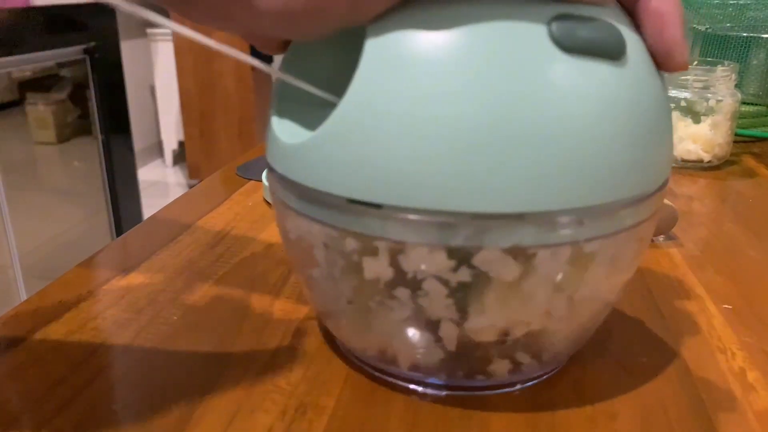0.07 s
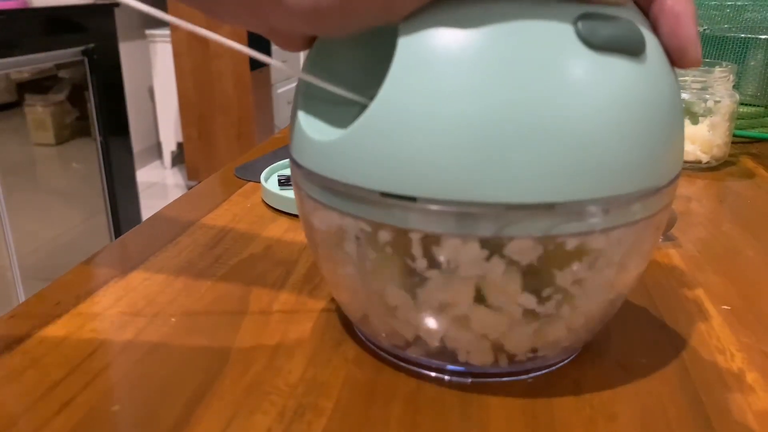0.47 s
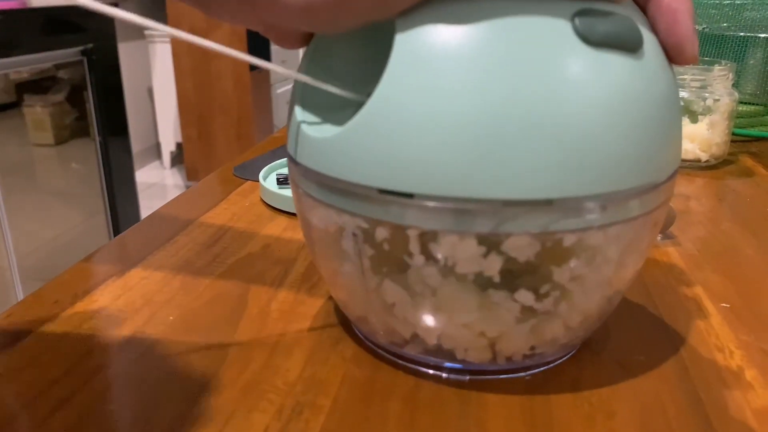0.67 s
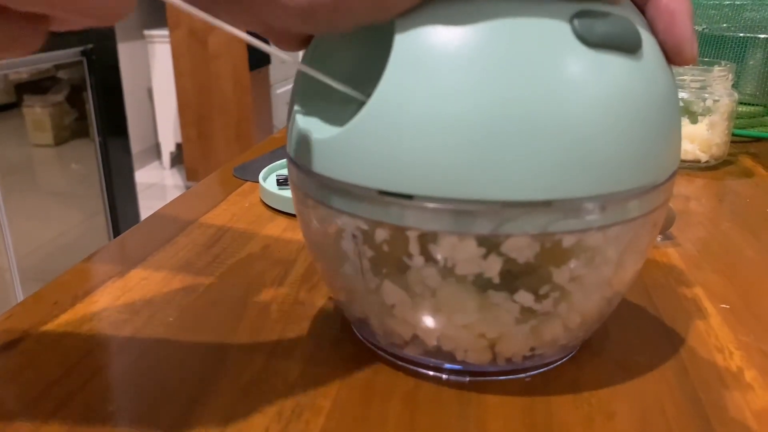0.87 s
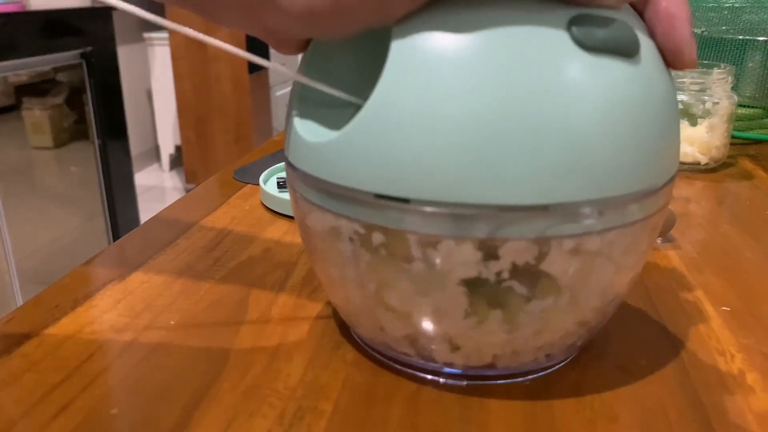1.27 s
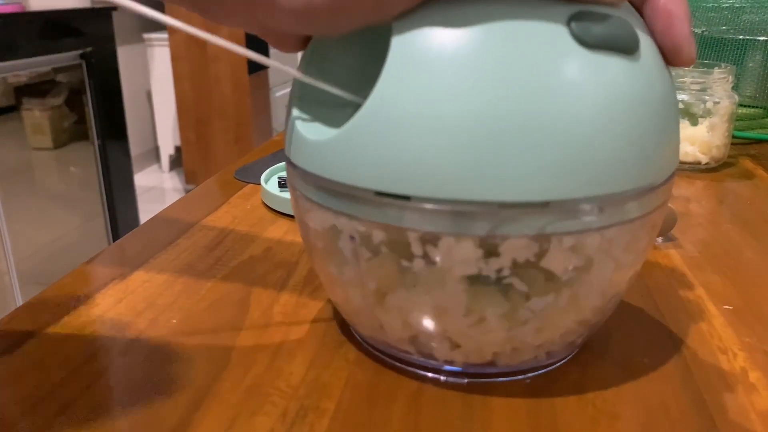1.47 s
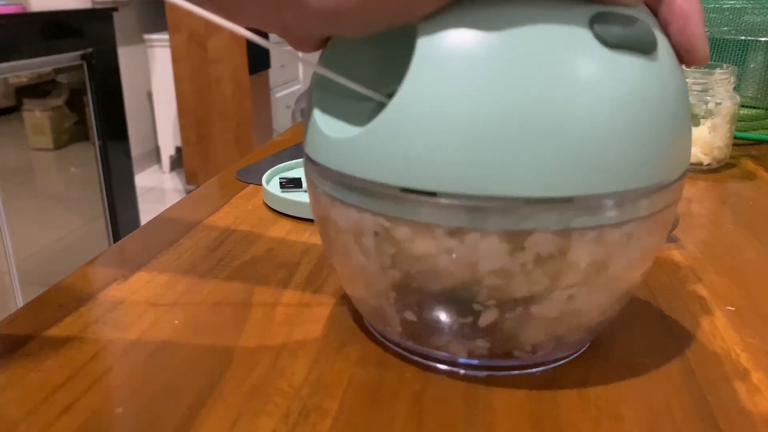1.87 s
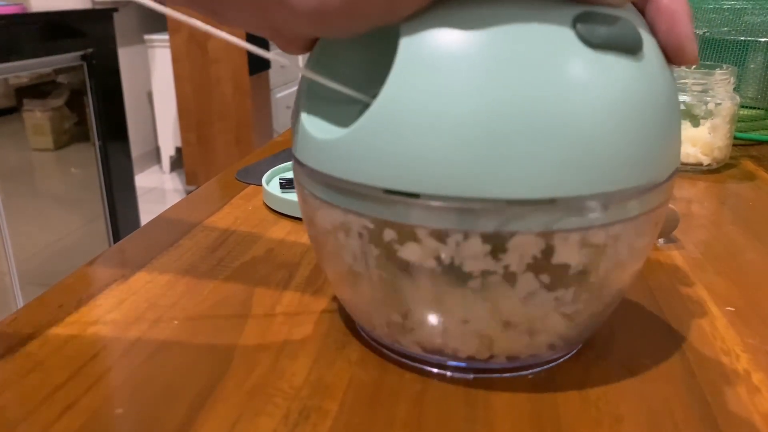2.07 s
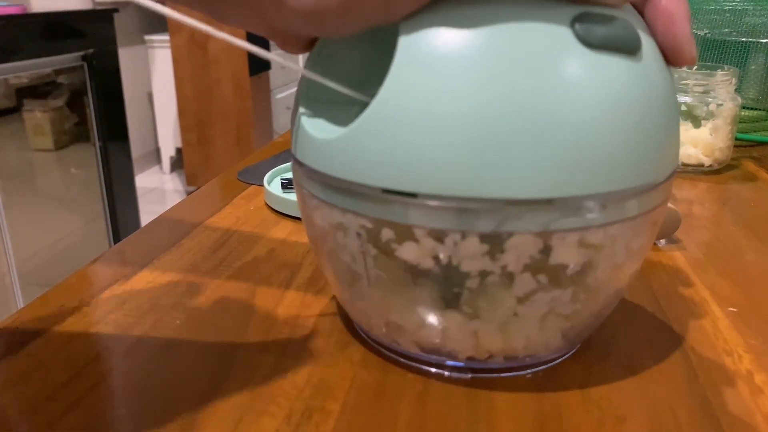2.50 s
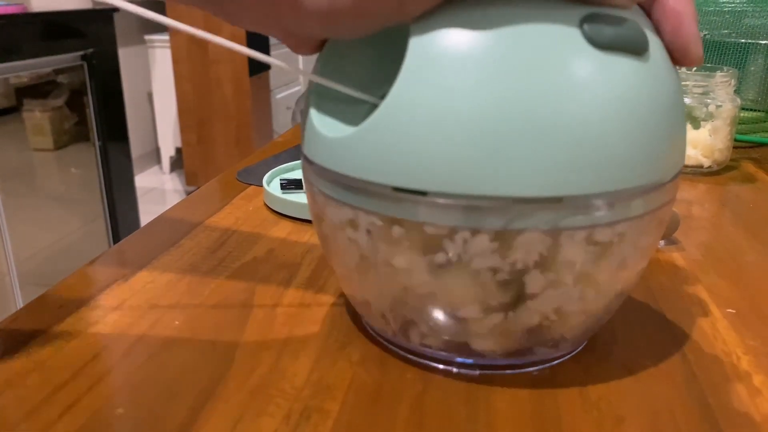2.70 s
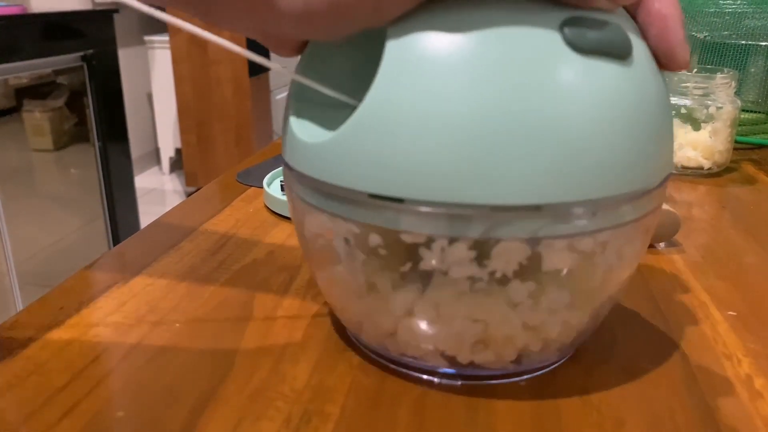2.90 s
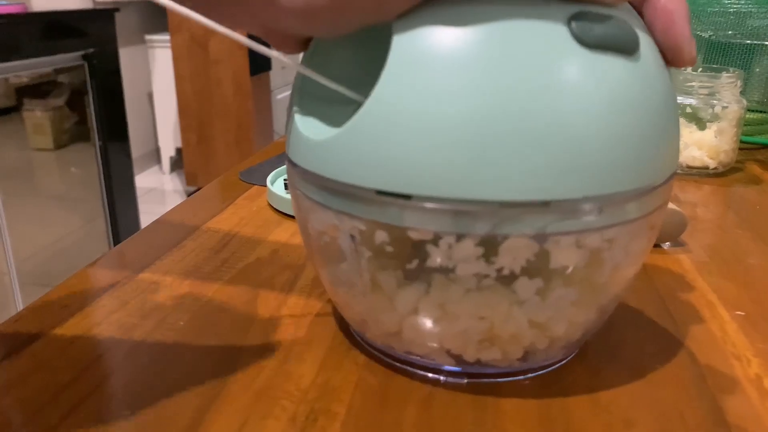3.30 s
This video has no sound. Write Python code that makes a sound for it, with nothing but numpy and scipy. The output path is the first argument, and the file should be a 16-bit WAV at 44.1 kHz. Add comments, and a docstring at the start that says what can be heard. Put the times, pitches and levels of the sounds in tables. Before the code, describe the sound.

A pull-cord food chopper is pulled four times, close by in a quiet kitchen. With each pull the cord rasps and pieces knock around the plastic bowl, then the reel rattles back and ends with a clack.

```python
"""Hand chopper on a kitchen table

A pull-cord chopper on a wooden table, close to a stereo pair and a little left, in a quiet kitchen.
Four pulls, then a faint tug: the cord rasps, the blades churn and food knocks on the plastic bowl.
After each of the four the spring reel rattles back over its ratchet and the slack goes with a clack."""
import sys
import numpy as np
from scipy import signal
from scipy.fft import rfft, irfft, next_fast_len
from scipy.io import wavfile
from scipy.ndimage import map_coordinates

SR = 44100
rng = np.random.default_rng(int(sys.argv[2]) if len(sys.argv) > 2 else 0)


def master_out(mix):
    """Clip the mix to full scale and print it as 16-bit PCM to the path in sys.argv[1]."""
    frames = np.transpose(np.atleast_2d(mix))
    ceiling = np.clip(frames, -1, 1)
    pcm = np.round(ceiling * 32767).astype(np.int16)
    wavfile.write(sys.argv[1], SR, pcm)


N = 152145

# Spectrum of the reel's spring and pawl. Each row: frequency in Hz, relative level in dB.
REEL = [(600, -13), (2300, -31), (2900, -11.5), (3400, -6.5), (4800, -2), (6000, -2), (7500, 0.5),
        (8900, 8), (11000, 0), (12400, 6), (14200, 6), (15300, -22), (16000, -14)]


def pulls():
    """The blades churn fine food round the bowl while the cord rasps through its eye."""
    # Spectra of the food and the cord. Each row: frequency in Hz, relative level in dB.
    churn = [(30, -48), (90, -23), (170, -1.5), (380, 6.5), (560, -3), (800, 3), (1050, -6.5), (1900, -6),
             (3000, -11.5), (4200, -9), (8000, -60)]
    rasp = [(800, -71), (3000, -3.5), (4800, 7.5), (6200, 9.5), (8000, 8.5), (9500, 16), (11500, 0),
            (13300, 14.5), (14800, -7), (16000, -26)]
    blade_gain = effort(start_db=-9.5, end_db=-10.5, coast_db=-12.5)
    cord_gain = effort(start_db=-9.5, end_db=-13, coast_db=-22)
    food = grains(blade_gain, churn, per_s=540, spread_db=1.0, life=0.51, spots=12)
    cord = grains(cord_gain, rasp, per_s=4500, spread_db=6.5, life=1.0, spots=14)
    return amp(1) * food + amp(-1.5) * cord


def effort(start_db, end_db, coast_db):
    """Gain over the pulls: build-up, full force, easing off, coasting; dB against full force."""
    # Pulls of the cord. Each row: start, full force, easing and end in seconds, relative level in dB.
    strokes = [(0.048, 0.112, 0.17, 0.35, -30), (0.936, 1.032, 1.117, 1.236, -30),
               (1.754, 1.785, 1.895, 2.01, -30), (2.549, 2.585, 2.65, 2.804, -33.5),
               (3.372, 3.405, 3.67, 3.44, -45)]
    release_s, rise_db_per_s, coast_db_per_s = 0.0046, 1000, 61
    t, gain = np.arange(N) / SR, np.zeros(N)
    for start, full, ease, end, db in strokes:
        force_db = np.interp(t, [start, full, ease, end, end + release_s],
                             [start_db, 0, 0, end_db, coast_db])
        gain += amp(force_db) * spin([(start, end, db)], rise_db_per_s, coast_db_per_s)
    return gain


def chunks():
    """Larger pieces thud against the bowl and crunch under a blade in five steps, the middle hardest."""
    # Pieces the blades strike. Each row: time in seconds, relative thud and crack levels in dB.
    strikes = [(.128, -13.5, -17.5), (0.149, -25, -20.5), (.165, -18, -17), (.197, -25, -23),
               (.215, -19.5, -24), (.233, -29, -33), (0.290, -27, -25), (0.347, -25, -32),
               (.396, -33.5, -60), (0.548, -19.5, -25), (0.987, -33, -19.5), (1.015, -16, -18.5),
               (1.036, -21.5, -42), (1.063, -19.5, -16.5), (1.086, -18.5, -17), (1.107, -16.5, -20.5),
               (1.142, -29, -25), (1.168, -56, -24.5), (1.205, -28, -39), (1.398, -33, -21),
               (1.798, -13.5, -20), (1.838, -39, -23), (1.860, -18.5, -14.5), (1.868, -22.5, -26),
               (1.882, -23, -47), (1.917, -30, -19), (1.994, -30, -28), (2.029, -28.5, -30),
               (2.204, -27.5, -31), (2.219, -21.5, -40), (2.411, -47, -39), (2.594, -25.5, -25.5),
               (2.624, -31, -50), (2.666, -22, -19.5), (2.691, -26, -27), (2.71, -23.5, -25),
               (2.721, -20.5, -25), (2.922, -38, -62), (3.021, -25, -34), (3.128, -25, -33)]
    # Spectra of thud and crack. Each row: frequency in Hz, relative level in dB.
    thud = [(40, -70), (120, -21), (230, 1.5), (370, 7.5), (560, 1), (850, 6), (1300, -17.5), (4000, -49)]
    crack = [(200, -11), (700, -7), (1200, -1.5), (1450, -0.5), (1850, 2), (2300, 0.5), (2900, -2.5),
             (3500, -4.5), (4400, -4.5), (6500, -6.5), (10000, -10.5)]
    step_s, step_loss_db = .002, 3.5
    out = np.zeros((2, N))
    for s, thud_db, crack_db in strikes:
        add(out, s, hit(thud_db, thud, life=0.53, attack_s=0.0011))
        for k in range(5):
            at = s + (k - 1 + rng.uniform(-.5, .5)) * step_s
            step_db = crack_db - 1.5 - abs(k - 2) * step_loss_db
            add(out, at, hit(step_db, crack, life=0.6, attack_s=0.0005))
    return out


def rewinds():
    """The reel spins back: the pawl ticks over its teeth, the spring scrapes, the housing rumbles."""
    # The reel winds the cord in, and races when the hand gives way.
    # Each row: start and end in seconds, relative level in dB.
    returns = [(.48, .785, -40), (1.33, 1.585, -41.5), (2.14, 2.43, -41), (2.96, 3.18, -45)]
    surges = [(.517, .588, -28.5), (.66, .70, -32.5), (1.362, 1.47, -30.5), (1.492, 1.528, -31),
              (2.188, 2.247, -25.5), (2.295, 2.345, -32.5), (2.983, 3.135, -32.5)]
    # Spectrum of the housing. Each row: frequency in Hz, relative level in dB.
    rumble = [(30, -66), (90, -29), (200, -3.5), (380, 0), (540, -3.5), (850, -2), (1050, -10), (1650, -10),
              (2300, -18), (3000, -17), (6000, -15)]
    run = spin(returns, rise_db_per_s=412, fall_db_per_s=220)
    race = spin(surges, rise_db_per_s=1300, fall_db_per_s=918)
    pawl = ratchet(run + amp(3.5) * race)
    spring = grains((run + race) * clumps(), REEL, per_s=510, spread_db=5, life=0.9, spots=6)
    housing = grains(run + amp(-1) * race, rumble, per_s=800, spread_db=9, life=0.63, spots=6)
    return amp(-10) * pawl + amp(-1.5) * spring + amp(-3) * housing


def ratchet(gain, teeth_per_s=54, scatter_teeth=.12, spread_db=0.83):
    """The pawl ticks once a tooth, slightly uneven in time and strength."""
    teeth = np.arange(1, int(N / SR * teeth_per_s) - 1)
    timing, strength = rng.standard_normal(size=(400, 2))[teeth].T
    at = (teeth + scatter_teeth * timing) / teeth_per_s * SR
    ticks = np.zeros(N)
    ticks[np.clip(at, 0, N - 1).astype(int)] = amp(spread_db * strength)
    tooth = ring(REEL, life=1.9, attack_s=0.0017)
    return signal.oaconvolve((unit(ticks) * gain)[None], tooth, axes=1)[:, :N]


def clumps(swing_db=0.5, changes_per_s=140):
    """The spring's coils slip in clumps: a fast, slightly uneven gain of rms 1."""
    at = np.arange(N) / SR * changes_per_s
    return unit(amp(swing_db * map_coordinates(rng.standard_normal(size=1024), [at], mode="mirror")))


def snaps():
    """Spring coils and pawl catch, then let go in three quick slips, each weaker than the last."""
    # Sharp snaps in the reel. Each row: time in seconds, relative level in dB.
    catches = [(0.108, -12.5), (0.127, -23), (0.183, -11.5), (.191, -22.5), (0.492, -30), (.512, -24.5),
               (0.523, -17.5), (0.546, -30.5), (.562, -11.5), (0.581, -15), (0.627, -22), (0.658, -19),
               (.684, -21.5), (0.691, -27), (0.734, -24), (0.995, -14.5), (1.0111, -15.5), (1.078, -12),
               (1.108, -25.5), (1.338, -29.5), (1.362, -22), (1.375, -19), (1.389, -21), (1.411, -14.5),
               (1.426, -20), (1.437, -18.5), (1.452, -17.5), (1.491, -16.5), (1.513, -18), (1.520, -18.5),
               (1.776, -18), (1.792, -17.5), (1.85, -15), (1.858, -20), (2.157, -25), (2.17, -21),
               (2.192, -18), (2.215, -15), (2.235, -12.5), (2.269, -21.5), (2.306, -21.5), (2.332, -18),
               (2.579, -20), (2.677, -15), (2.982, -21), (3.018, -14.5), (3.042, -25), (3.059, -27),
               (3.071, -21), (3.089, -26), (3.111, -36), (3.127, -20.5), (3.147, -41), (3.163, -24),
               (3.209, -42)]
    slip_s, slip_loss_db = 0.0029, 2.5
    out = np.zeros((2, N))
    for s, db in catches:
        for k in range(3):
            at = s + k * slip_s * rng.uniform(.75, 1.5)
            add(out, at, hit(db - 2.5 - k * slip_loss_db, REEL, life=0.96, attack_s=0.00043))
    return out


def clacks():
    """The drive takes up its slack between strokes: a tick, then a clack with a hollow tock."""
    # Each row: time in seconds, relative tick level in dB, delay in seconds, relative clack level in dB.
    take_ups = [(0.869, -33, 0.0035, -39.5), (1.6646, -28, 0.0034, -23.5), (2.473, -30, 0.004, -32),
                (3.286, -29.5, 0.0067, -38.5)]
    # Spectrum of the clack. Each row: frequency in Hz, relative level in dB.
    clack = [(200, -8.5), (450, 0), (1600, 0), (2700, -7.5), (6400, -5.5), (8900, 1), (10500, 2),
             (15000, -30)]
    # Modes of the housing. Each row: frequency in Hz, relative level in dB, t60 in seconds.
    modes = [(394, 7.5, 0.032), (654, 2, 0.035), (831, 9, 0.031), (1175, -5, 0.016), (1820, 2, 0.017),
             (6440, -3, 0.038)]
    out, t = np.zeros((2, N)), np.arange(SR // 8) / SR
    attack = 1 - np.exp(-t / 0.002)
    for s, tick_db, delay, clack_db in take_ups:
        add(out, s, hit(tick_db, REEL, life=1.0, attack_s=0.0021))
        add(out, s + delay, hit(clack_db + 5.5, clack, life=0.96, attack_s=0.001))
        tock = sum(damped_sine(t, hz, db + rng.normal(0, 1.0), t60) for hz, db, t60 in modes)
        add(out, s + delay, amp(clack_db + 2.5) * (tock * attack)[None])
    return out


def bumps(attack_s=0.0046, t60_s=0.049):
    """The wobbling reel nudges the housing: soft, hollow, quickly damped notes."""
    # Each row: time in seconds, pitch in Hz, relative level in dB.
    nudges = [(1.416, 404, -23.5), (1.455, 560, -26), (1.491, 668, -23), (2.282, 410, -25),
              (2.308, 333, -25), (2.991, 348, -24.5), (3.106, 310, -27), (3.159, 630, -32.5)]
    out, t = np.zeros((2, N)), np.arange(SR // 8) / SR
    attack = 1 - np.exp(-t / attack_s)
    for s, hz, db in nudges:
        add(out, s, 2 * (attack * damped_sine(t, hz, db, t60_s))[None])
    return out


def spin(spans, rise_db_per_s, fall_db_per_s):
    """Gain of a turning part: it spins up, holds over each span and runs down."""
    t = np.arange(N) / SR
    return sum(amp(db - rise_db_per_s * np.maximum(start - t, 0) - fall_db_per_s * np.maximum(t - end, 0))
               for start, end, db in spans)


def grains(gain, spectrum, per_s, spread_db, life, spots):
    """Many tiny contacts at a few spots of the body, each spot with its own ring."""
    out = np.zeros((2, N))
    for _ in range(spots):
        struck = rng.random(N) < per_s / spots / SR
        strength = amp(spread_db * np.clip(rng.standard_normal(N), -2, 2))
        taps = unit(struck * strength * rng.choice([-1, 1], N)) * gain
        out += signal.oaconvolve(taps[None], ring(spectrum, life, attack_s=0.00018), axes=1)[:, :N]
    return out / np.sqrt(spots)


def hit(db, spectrum, life, attack_s, span_s=.004):
    """A single contact, with the energy of a level of db held for span_s."""
    return amp(db) * np.sqrt(span_s * SR) * ring(spectrum, life, attack_s)


def ring(spectrum, life, attack_s):
    """Dense plastic modes after a contact, the high ones dying first; energy 1 a channel."""
    # Decay of the plastic body. Each row: frequency in Hz, t60 in seconds before life scales it.
    decay = [(200, 0.073), (500, 0.11), (1400, 0.048), (4000, 0.038), (12000, 0.017)]
    source = noise(spectrum, size=4096, colour_db=spot_db)
    hz, t, bands = signal.stft(source, SR, nperseg=64)
    fade = amp(-60 * t / (life * along(decay, hz)[:, None]))
    x = signal.istft(bands * fade, SR, nperseg=64)[1]
    x = x * (1 - np.exp(-np.arange(x.shape[1]) / SR / attack_s))
    return x / np.sqrt(np.sum(x ** 2) / 2)


def spot_db(hz, depth_db=5, spacing_hz=256.5):
    """The body's resonances, plus the random peaks and dips of one struck spot."""
    # Resonances of lid and bowl. Each row: centre in Hz, width in Hz, lift in dB.
    body = [(1222, 170, 6), (1605, 30, 11), (1892, 80, 7.5), (3020, 350, 8), (4660, 160, 3.5),
            (7470, 830, 5), (10450, 670, 5.5)]
    ripple = map_coordinates(rng.standard_normal(size=256), [hz / spacing_hz], mode="mirror")
    return depth_db * ripple + sum(db / (1 + (2 * (hz - centre) / width) ** 2) for centre, width, db in body)


def from_left(x, mono_hz=350):
    """The left microphone hears the chopper first; long waves reach both nearly in step."""
    # Each row: frequency in Hz, left phase lead in radians before it is tapered in the bass.
    lead = [(400, 0.068), (950, 1.36), (1550, 0.14), (2700, 1.88), (5000, 4), (8500, 3.54), (11000, 5.67),
            (13000, 0.63), (16000, 33)]

    def response(hz):
        phase = along(lead, hz) * hz ** 2 / (hz ** 2 + mono_hz ** 2)
        return np.exp(.5j * phase * np.array([[1], [-1]]))
    return filtered(x, response)


def room(x):
    """The kitchen's short reverberation, alike at both microphones in the bass."""
    # Each row: frequency in Hz, t60 in seconds.
    decay = [(150, 0.066), (1000, 0.16), (5000, 0.15), (14000, 0.055)]
    hz, t, bands = signal.stft(noise([(1, 0)], size=SR // 2), SR, nperseg=256)
    tail = signal.istft(bands * amp(-60 * t / along(decay, hz)[:, None]), SR, nperseg=256)[1]
    return signal.fftconvolve(x, tail / np.linalg.norm(tail[0]), axes=1)[:, :N]


def kitchen():
    """Room tone: a steady, low hush behind the chopper."""
    # Each row: frequency in Hz, relative level in dB.
    hush = [(20, -35), (35, -12), (50, 6), (70, -8.5), (130, -3.5), (400, -3.5), (800, -18.5), (2000, -16),
            (5000, -19.5), (10000, -25), (16000, -51)]
    return noise(hush, size=N)


def noise(spectrum, size, colour_db=lambda hz: 0):
    """Coloured noise at the two microphones, alike in the bass."""
    # Each row: frequency in Hz, correlation of left and right.
    likeness = [(60, 0.92), (250, 1), (700, 0.9), (1500, 0.75), (4000, 0.19), (9000, 0.62)]

    def response(hz):
        turn = np.arccos(np.clip(along(likeness, hz), -1, 1)) / 2
        return amp(along(spectrum, hz) + colour_db(hz)) * [np.cos(turn), np.sin(turn)]
    mid, side = filtered(rng.standard_normal((2, size)), response)
    return unit(np.array([mid + side, mid - side]))


def damped_sine(t, hz, db, t60):
    """One dying mode at a random phase."""
    return amp(db - 60 * t / t60) * np.sin(2 * np.pi * (hz * t + rng.random()))


def amp(db):
    """Decibels to gain."""
    return 10 ** (np.asarray(db) / 20)


def unit(x):
    """Scaled to rms 1."""
    return x / np.sqrt(np.mean(x ** 2) + 1e-20)


def along(points, hz):
    """(Hz, value) points read on a log axis."""
    f, v = np.transpose(points)
    return np.interp(np.log(hz + 1), np.log(f + 1), v)


def filtered(x, response):
    """x through a frequency response."""
    n = x.shape[-1]
    m = next_fast_len(n + 2048)
    return irfft(rfft(x, m) * response(np.fft.rfftfreq(m, 1 / SR)), m)[..., :n]


def add(track, s, sound):
    """Mix a sound in at s seconds."""
    part = track[:, max(0, round(s * SR)):][:, :sound.shape[1]]
    part += sound[:, :part.shape[1]]


def scene():
    """The chopper close by and a little to the left, with the kitchen's echo and hush behind it."""
    low_cut_hz = 88.5  # little deep bass is heard from the chopper
    chopper = pulls() + chunks() + rewinds() + bumps() + snaps() + clacks()
    chopper = signal.sosfilt(signal.butter(2, low_cut_hz, "high", fs=SR, output="sos"), chopper)
    chopper = from_left(chopper)
    return chopper + amp(-10.5) * room(chopper) + amp(-52) * kitchen()


def record(dry):
    """Nothing is kept above 15.9 kHz."""
    return filtered(dry, lambda hz: hz < 15900)


dry = scene()
out = record(dry)
master_out(out)
```